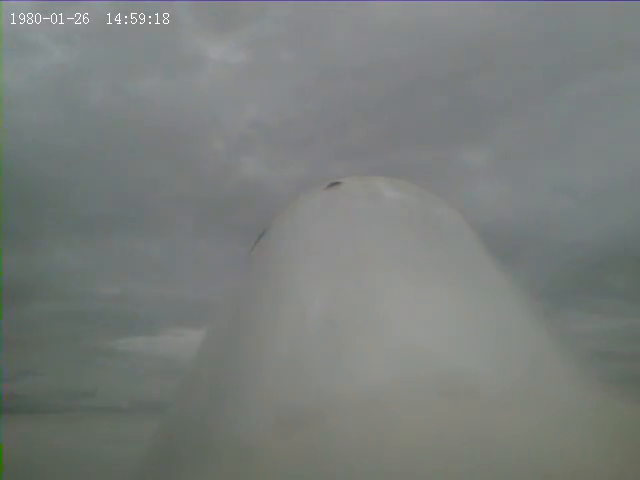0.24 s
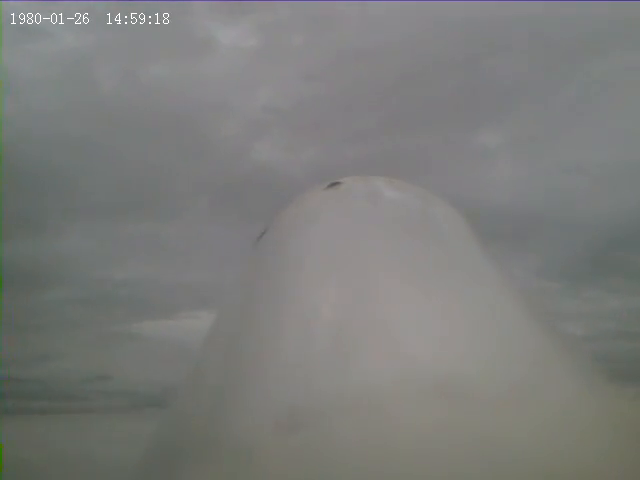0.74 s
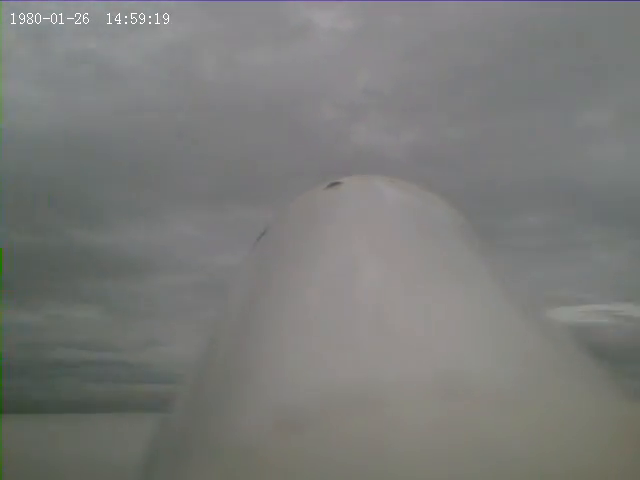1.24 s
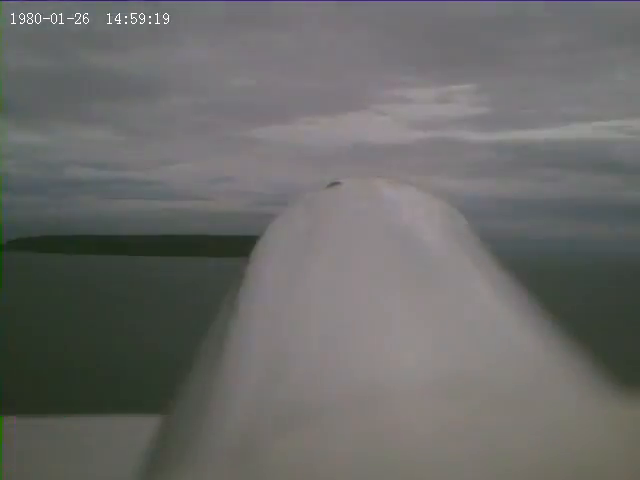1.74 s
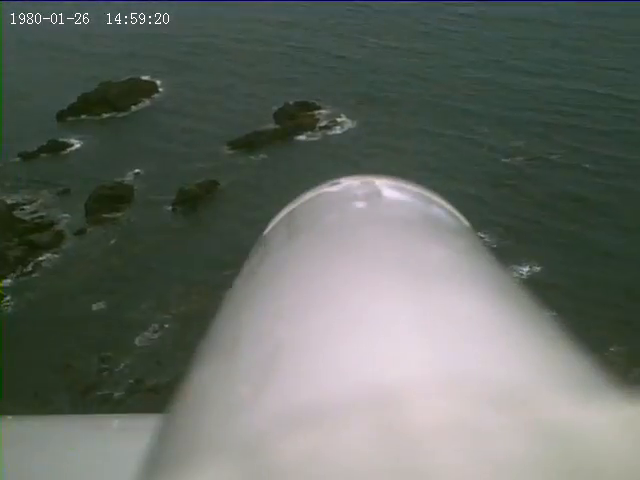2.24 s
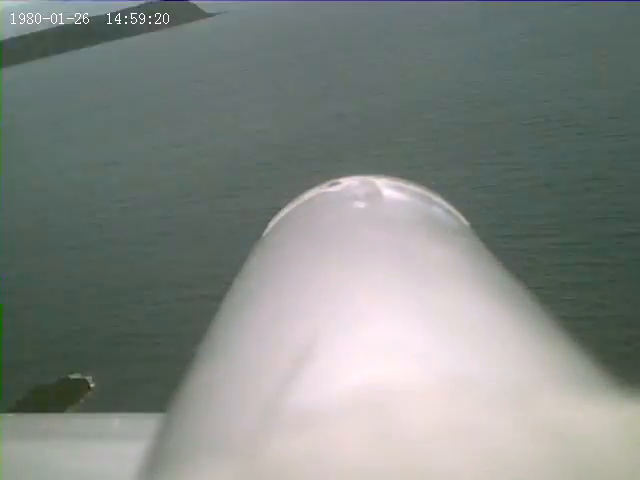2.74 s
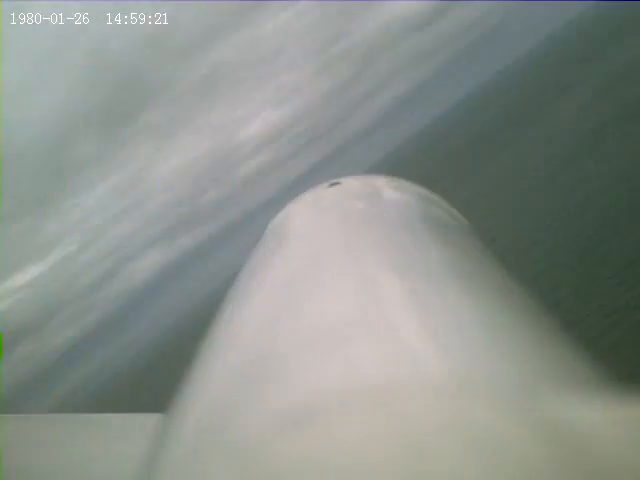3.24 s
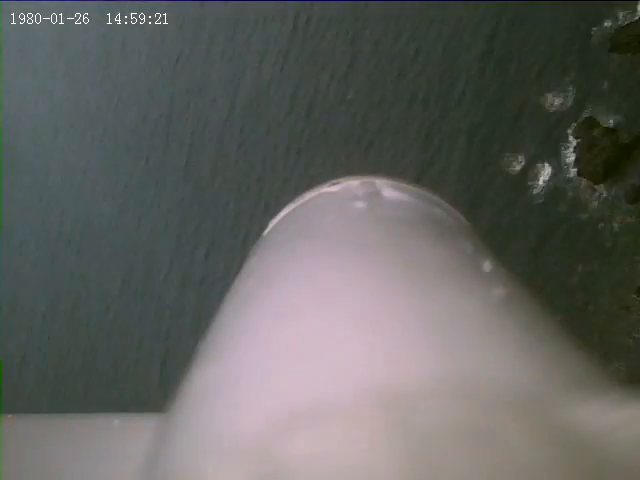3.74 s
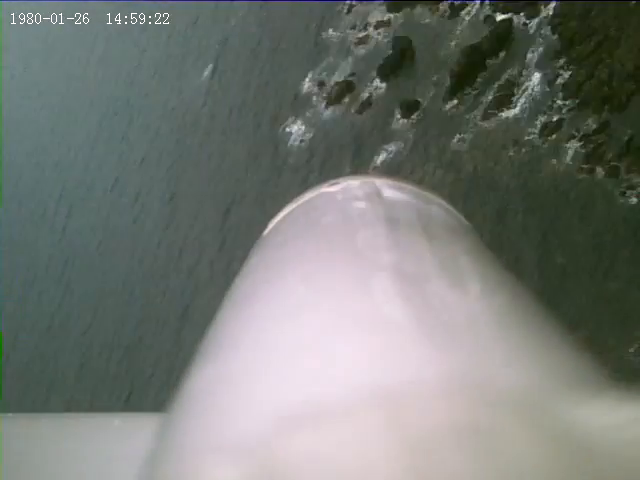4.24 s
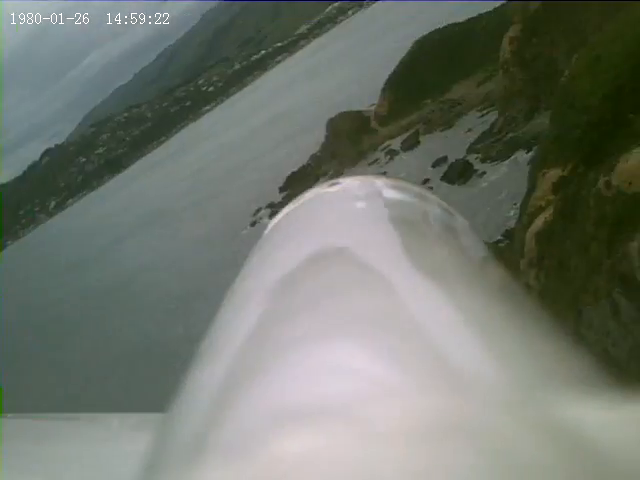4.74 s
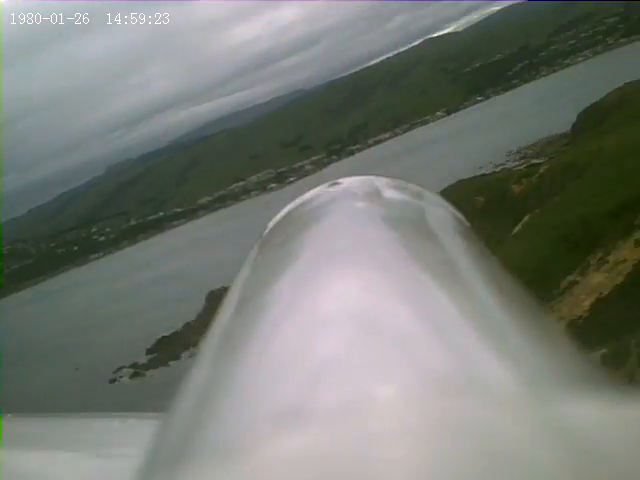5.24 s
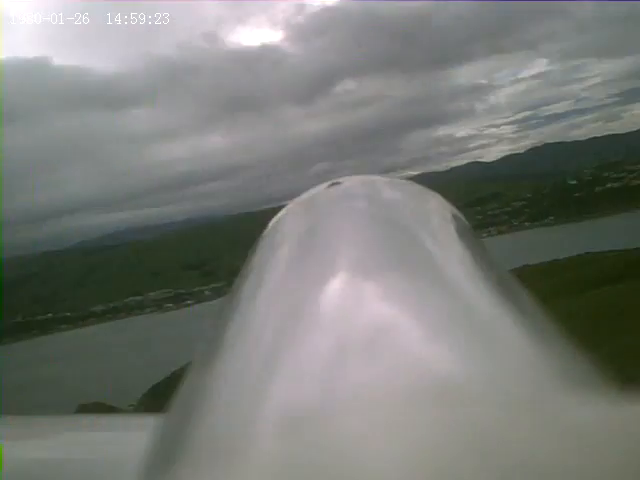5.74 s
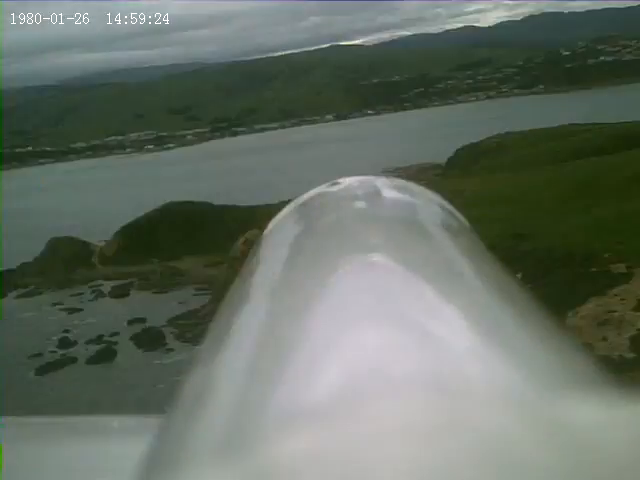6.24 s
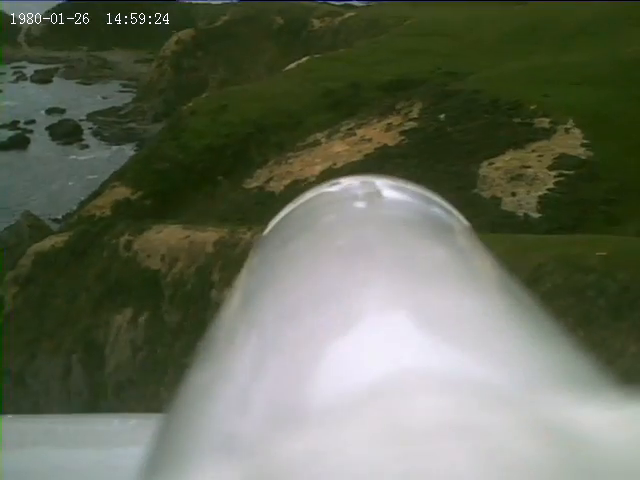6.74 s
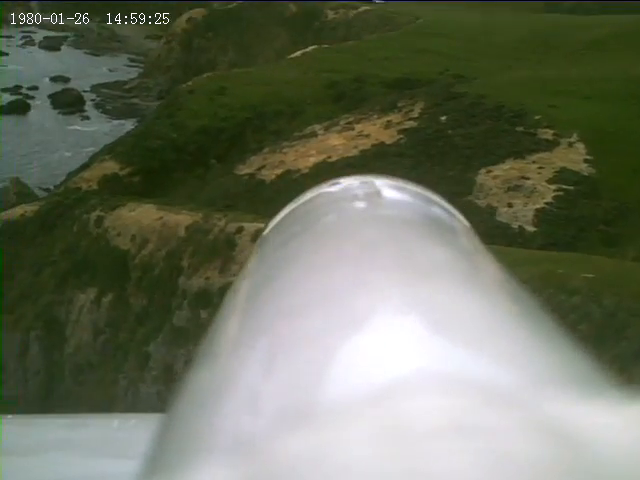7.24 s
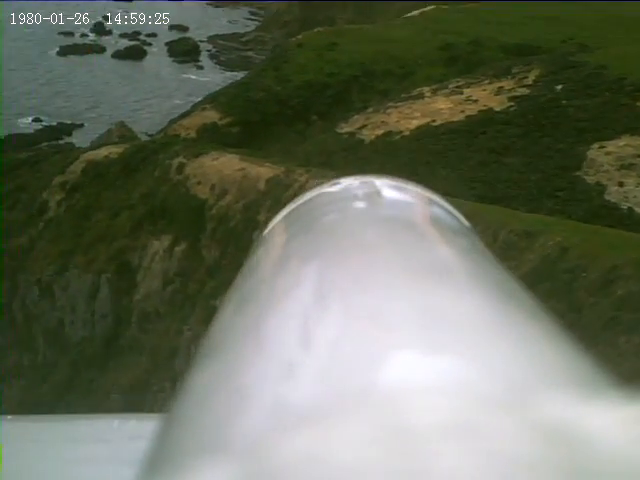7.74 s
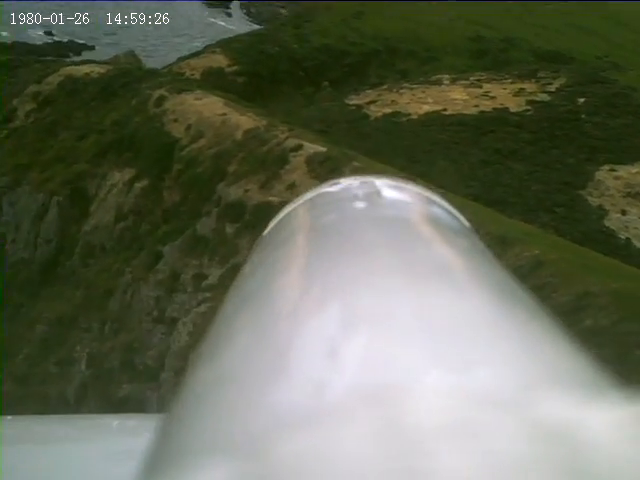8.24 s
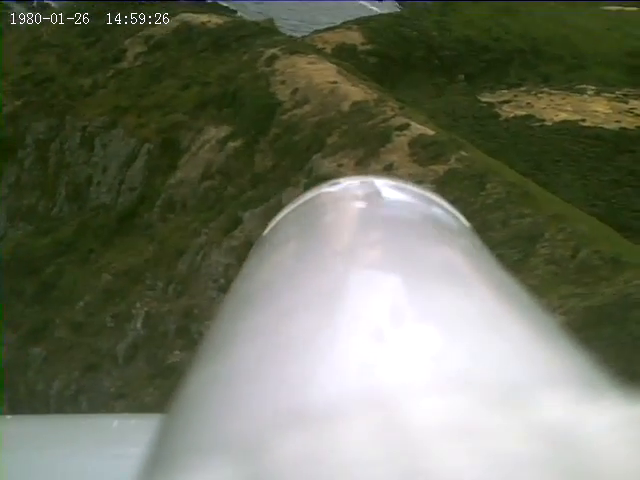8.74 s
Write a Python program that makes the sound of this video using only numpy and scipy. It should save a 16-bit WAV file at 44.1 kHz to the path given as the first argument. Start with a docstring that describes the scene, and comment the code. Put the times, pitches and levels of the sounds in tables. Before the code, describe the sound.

Overloaded airflow batters a microphone on a model glider, sputtering with sharp slaps, dipping briefly, then swelling into a dense, harsh, continuous roar.

```python
"""Wind overload on a glider's microphone

Air rushes over a small camera on a model glider that slows, banks and dives.
Turbulence at the microphone port, with the fuselage's wake and steep pressure fronts, overloads the input:
clipping turns the buffeting into a square, crackling roar as speed builds.
The recorder's narrow voice band dulls it, and a second clipping adds a thin fizz to every steep edge."""
import sys
import numpy as np
from scipy import signal
from scipy.fft import rfft, irfft, next_fast_len
from scipy.io import wavfile

SR = 44100
rng = np.random.default_rng(int(sys.argv[2]) if len(sys.argv) > 2 else 0)


def generate_wav(signal):
    """Clip the signal to [-1, 1] and save it as 16-bit WAV at the path in sys.argv[1]."""
    frames = np.transpose(np.atleast_2d(signal))
    scaled = np.clip(frames, -1, 1) * 32767
    pcm = np.round(scaled).astype(np.int16)
    wavfile.write(sys.argv[1], SR, pcm)


N = 395577


def gain_of(db):
    """Decibel law: 20 dB is a factor of ten in pressure."""
    return 10 ** (np.asarray(db) / 20)


def evened(x):
    """Power normalization: scales a signal to rms 1."""
    return x / np.sqrt(np.mean(x ** 2) + 1e-20)


def filtered(x, response):
    """Linear filtering: multiplies the spectrum by a zero-phase gain, a function of frequency [Hz]."""
    size = next_fast_len(len(x) + 4096)  # zero padding for the filter's tail
    hz = np.fft.rfftfreq(size, 1 / SR)
    return irfft(rfft(x, size) * response(hz), size)[:len(x)]


def wander(rate_hz):
    """Band-limited randomness: noise under a Gaussian low-pass, rms 1, with changes up to about the rate."""
    return evened(filtered(rng.standard_normal(N), lambda hz: np.exp(-(hz / rate_hz) ** 2)))


def bumps(rows, t):
    """Superposition: a sum of Gaussian swings from rows (time [s], half length [s], height, ...)."""
    return sum(height * np.exp(-((t - s) / half) ** 2) for s, half, height, *_ in rows)


# the glider slows to the top of its climb, banks, then dives: (time [s], airspeed [re cruising])
FLIGHT_SPEED = [(0, 0.99), (.3, 1.026), (.41, 0.9), (.95, 0.9), (1.45, .76), (1.58, 0.7), (2.0, 0.82),
                (2.3, 0.91), (2.8, 1.093), (3.3, 0.89), (3.58, 1.09), (4.02, 0.99), (4.22, 1.2),
                (4.85, 1.406), (5.9, 1.48), (7.2, 1.6), (7.9, 1.7), (8.95, 1.84)]
# short gusts: (time [s], half length [s], rise of airspeed [share])
SHORT_GUSTS = [(.507, .025, 0.074), (2.095, 0.034, .2), (2.15, .025, 0.16), (2.48, .03, 0.082),
               (2.79, 0.033, 0.18), (2.86, 0.017, .2), (3.08, .04, .17), (3.87, 0.065, 0.12),
               (4.8, 0.034, 0.096)]


def airspeed(t):
    """Relative flow: the air's speed past the port, re cruising, is the flight's raised by the gusts."""
    return np.interp(t, *np.transpose(FLIGHT_SPEED)) * (1 + bumps(SHORT_GUSTS, t))


def hiss(hiss_db=-39, edge_hz=3600, edge_width_hz=250, edge_db=6):
    """Boundary-layer noise: a thin rush over the skin, with a fuzzy edge tone; level re the eddies."""
    def colour(hz):
        edge_tone = gain_of(edge_db * np.exp(-((hz - edge_hz) / edge_width_hz) ** 2))
        return edge_tone / (1 + (hz / edge_hz) ** 4)
    return gain_of(hiss_db) * evened(filtered(rng.standard_normal(N), colour))


# manoeuvres in which the fuselage's wake washes over the port:
# (time [s], half length [s], pressure rise [dB], shedding rate [Hz])
WAKE_PASSAGES = [(1.351, .25, 2.5, 130), (1.618, .16, 5, 74.99), (1.86, .14, 4.5, 125),
                 (3.02, 0.19, 6.5, 110), (3.33, 0.16, 5.5, 105), (3.621, 0.13, 5, 140),
                 (3.873, .12, 6.5, 160), (4.501, 0.3, 3, 95)]


def wake(spread_hz=55):
    """Vortex shedding: the fuselage sheds vortices at a loose rate, a low throb of narrow-band noise."""
    s, _, _, shed_hz = np.transpose(WAKE_PASSAGES)
    rate_hz = np.interp(np.arange(N) / SR, s, shed_hz)
    phase = 2 * np.pi * np.cumsum(rate_hz) / SR
    return wander(spread_hz) * np.cos(phase) + wander(spread_hz) * np.sin(phase)


CRUISE_CORNER_HZ = 228.6  # eddy corner at cruising speed, in proportion to airspeed
OCTAVES_PER_DB = 0.14  # in the wake the eddies are larger: the corner sinks as the pressure rises


def eddies(leak_hz=190, slope=1.97, port_hz=1200, port_q=1.31, coupling_hz=55):
    """Turbulent cascade: faster flow sheds quicker eddies and moves the corner of this rms 1 noise up."""
    size = 1024
    hop = size // 4
    frames = N // hop + 5
    hz = np.fft.rfftfreq(size, 1 / SR)
    t = np.arange(frames) * hop / SR
    growth = 2 ** (OCTAVES_PER_DB * bumps(WAKE_PASSAGES, t))
    corner = (CRUISE_CORNER_HZ * airspeed(t) / growth)[:, None]
    cascade = (1 + (hz / corner) ** 2) ** (-slope / 2)  # small eddies carry ever less pressure
    leak = hz / np.hypot(hz, leak_hz)  # the capsule's vent lets slow pressure escape
    # the cavity behind the opening: a damped low-pass
    port = 1 / np.hypot(1 - (hz / port_hz) ** 2, hz / port_hz / port_q)
    coupling = hz / np.hypot(hz, coupling_hz)  # the input capacitor blocks the deepest rumble
    shape = cascade * leak * port * coupling
    shape /= np.linalg.norm(shape, axis=1, keepdims=True)  # equal power in every frame
    noise = rng.standard_normal(shape.shape) + 1j * rng.standard_normal(shape.shape)
    _, pressure = signal.istft((noise * shape).T, nperseg=size, noverlap=size - hop)
    return evened(pressure[:N])


# the steepest pressure fronts that slap the port:
# (time [s], strength [dB re a front peaking at 21 times the clipping level])
STEEP_FRONTS = [(0.1235, -22), (0.2545, -12), (0.5087, -14.5), (0.587, -14.5), (0.6852, -15), (.7493, -20),
                (1.3822, -15.5), (1.446, -15.5), (1.7685, -21.5), (1.867, -20.5), (1.943, -15),
                (2.144, -13.5), (2.478, -13.5), (2.8487, -14.5), (3.0874, -6), (3.225, -7.5),
                (3.307, -10.5), (3.487, -2.5)]
SMALL_SLAPS_PER_S, SMALL_SLAP_DB = 8, -26  # weaker fronts arrive at random, strength on the same scale


def slaps():
    """Impulsive loading: each front swings steeply through zero, either way, past the clipping level."""
    s, db = np.transpose(STEEP_FRONTS)
    kicks = gain_of(SMALL_SLAP_DB) * (rng.random(N) < SMALL_SLAPS_PER_S / SR)
    kicks[np.round(s * SR).astype(int)] = gain_of(db)
    u = np.arange(-200, 201) / SR / .0009  # time in units of 0.9 ms
    front = 50 * u * np.exp(-u ** 2)
    return signal.oaconvolve(kicks * rng.choice([-1, 1], N), front, "same")


# moments when the flow lets go of the port: (time [s], half length [s], depth [dB])
FLOW_LULLS = [(1.035, 0.015, 3), (1.515, 0.0093, 7), (1.568, 0.0075, 10), (1.754, 0.0058, 16),
              (1.925, 0.0075, 17.5), (1.953, 0.0055, 7.5), (2.028, 0.013, 5), (2.218, 0.01, 4),
              (3.19, 0.013, 7), (3.33, 0.007, 13.5)]
CRUISE_DB, DB_PER_DOUBLING = 3.5, 18.5  # pressure re the clipping level, and its rise with airspeed
THROB_DB, THROB_PER_DB = -10.5, 1.5  # wake's throb re the other eddies, and its growth per dB of wake rise


def wind(fine_hz=800, fine_db=-4.0):
    """Power law of flow noise: pressure grows with airspeed and in the wake, with lulls and quick flutter."""
    t = np.arange(N) / SR
    air = eddies()
    fine = filtered(air, lambda hz: hz ** 2 / (hz ** 2 + fine_hz ** 2))
    # the finest eddies come in clumps a few milliseconds long
    clumps = evened(gain_of(4.2 * wander(150)))
    air = air - fine + fine * clumps * gain_of(fine_db)
    wake_db = bumps(WAKE_PASSAGES, t)
    throb = gain_of(THROB_DB + THROB_PER_DB * wake_db)
    air = (air + throb * wake()) / np.hypot(1, throb)
    # each eddy has its own strength, so some edges are soft and some snap
    flutter_db = 3.7 * wander(220)
    speed_db = DB_PER_DOUBLING * np.log2(airspeed(t))
    level_db = CRUISE_DB + speed_db + wake_db - bumps(FLOW_LULLS, t)
    return (air * gain_of(flutter_db) + hiss()) * gain_of(level_db)


def scene():
    """Superposition at one microphone: the wind's pressure and the slaps add."""
    return (wind() + slaps())[None]


# treble of the recorder after its clipping, flat below the first point: (frequency [Hz], gain [dB])
RECORDER_TREBLE = [(3000, 1), (3700, 0.6), (5000, -0.5), (6500, 3.5), (7700, 7.5), (8150, -3),
                   (10500, -0.5), (13000, 5), (15500, 5)]
VOICE_BAND_HZ, EDGE_HZ = 3946, 15850  # low-pass between the two clippings, and the final one
FIZZ_GAIN = .705  # level after the second clipping


def record(dry, steepness=48):
    """Nonlinear distortion: the input clips, a steep voice band rings, and the overshoot clips again."""
    squared = np.clip(dry[0], -1, 1)
    narrow = filtered(squared, lambda hz: 1 / np.sqrt(1 + (hz / VOICE_BAND_HZ) ** steepness))
    fizzing = FIZZ_GAIN * np.clip(narrow, -1, 1)
    out = filtered(fizzing, lambda hz: gain_of(np.interp(hz, *np.transpose(RECORDER_TREBLE), left=0)))
    edge = signal.firwin(511, EDGE_HZ, window=("kaiser", 9), fs=SR)
    return signal.oaconvolve(out, edge, "same")[None]


dry = scene()
out = record(dry)
generate_wav(out)
```